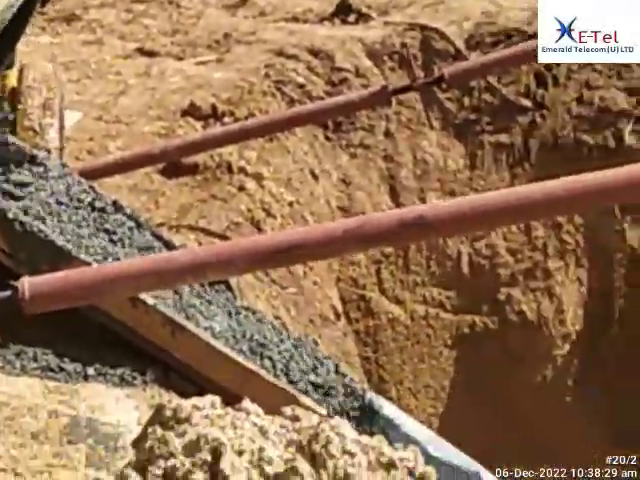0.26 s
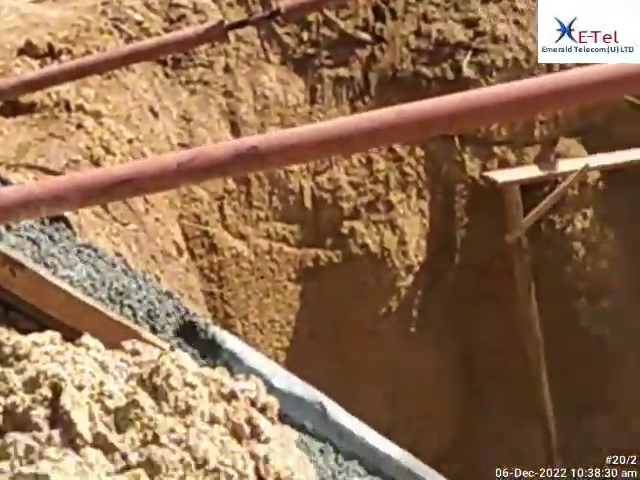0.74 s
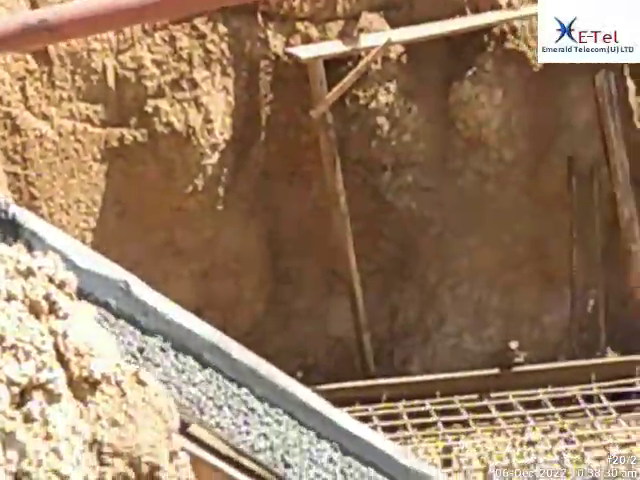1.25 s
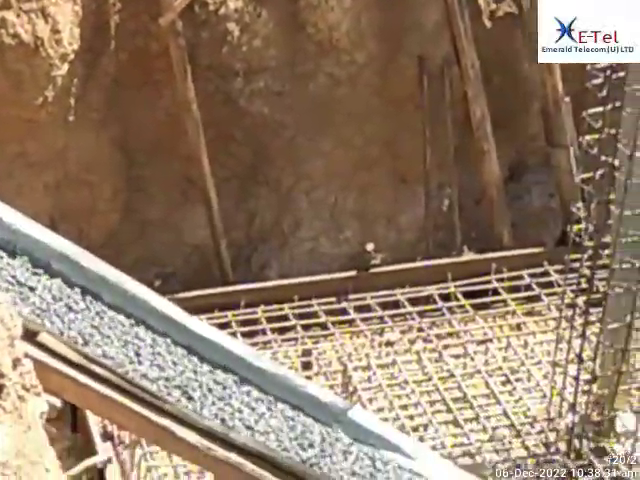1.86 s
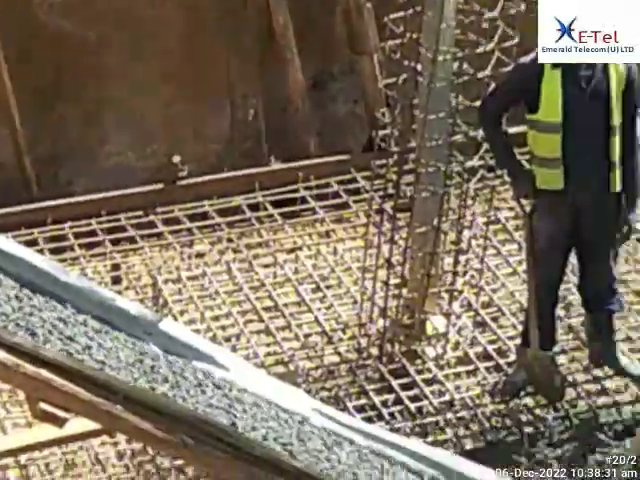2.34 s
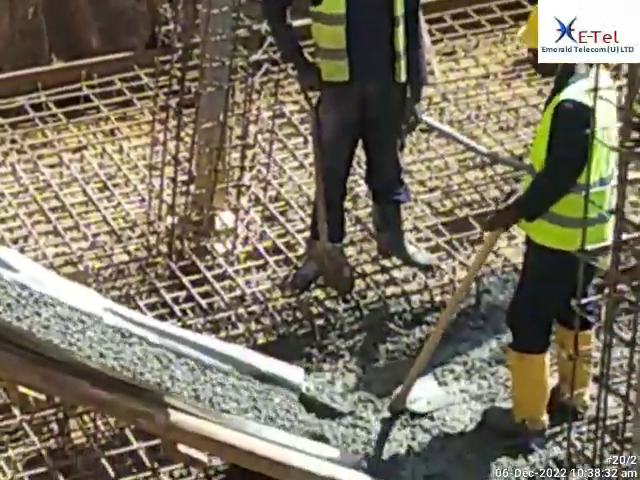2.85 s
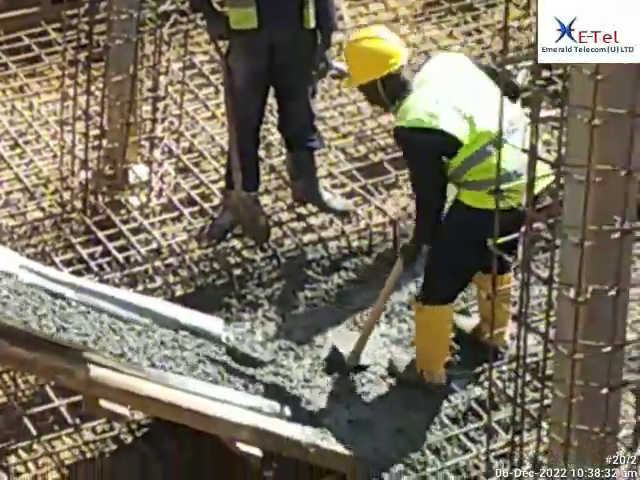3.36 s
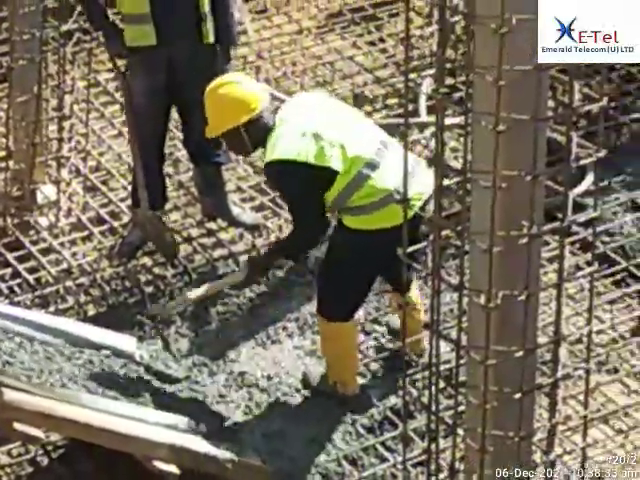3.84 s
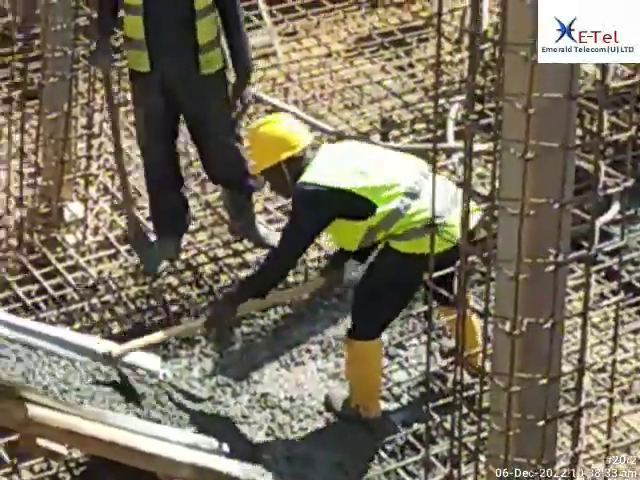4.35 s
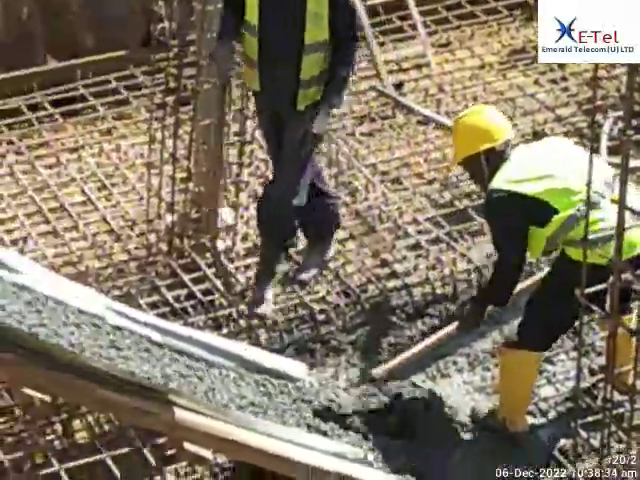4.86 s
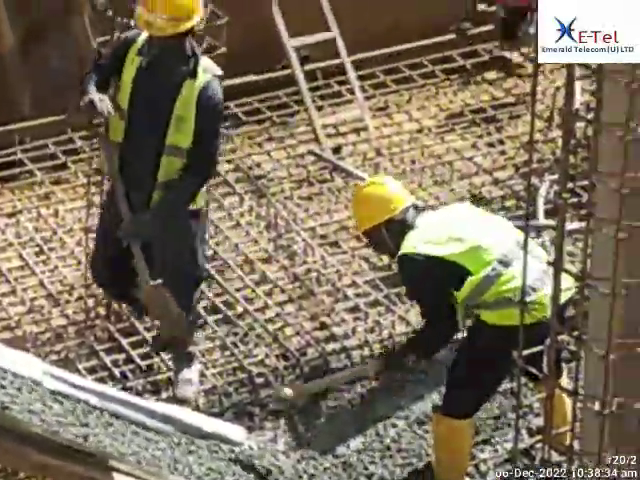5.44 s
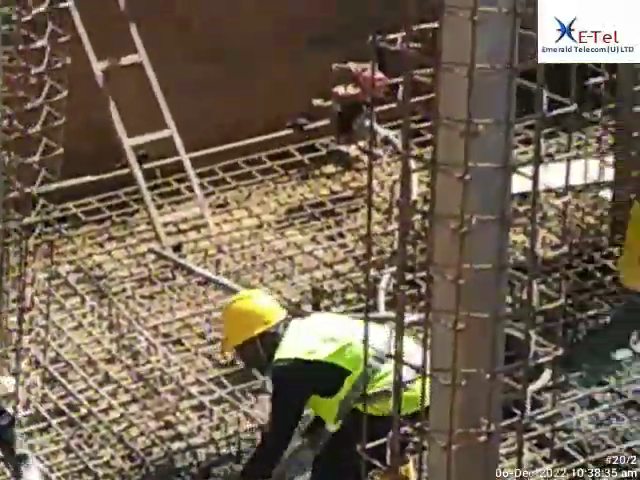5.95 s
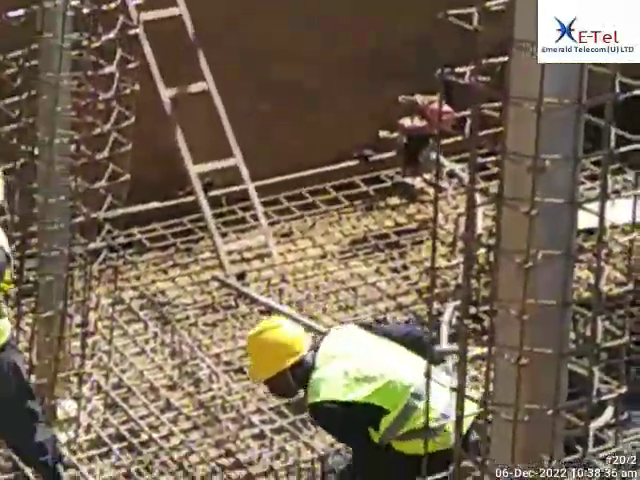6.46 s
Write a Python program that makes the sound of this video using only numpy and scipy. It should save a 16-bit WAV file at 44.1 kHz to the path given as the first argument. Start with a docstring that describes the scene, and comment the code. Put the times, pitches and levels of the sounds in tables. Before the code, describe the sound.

From 0 to about 6.75 seconds, a single-cylinder engine runs without pause, its hollow, dry exhaust chuffs firing roughly 11.5 times a second, with small block knocks and frame buzz in step. It quickens barely until 2 seconds, then slows gradually to below 11 a second at the end. A mixer drum rumbles beneath it, with irregular dull thuds of falling load throughout and stones clattering on steel. Wet gravel hisses continuously down a chute, with fine fizz and a fluttering bright rasp. Pebbles tick near 0.4, 0.85 and 2.4 seconds; larger stones knock around 0.9, 3.6-3.7, 4.9, 5.7 and 6.4. Brief gritty hoe scrapes come near 0.4, 3.6, 4.9, 5.4 and 6.2. A distant machine hums faintly. The phone microphone sounds close, thin in bass and slightly dulled on top, with short echoes from the pit walls.

```python
"""Regular exhaust chuffs strike the ear first, over a rumbling drum and the hiss of wet gravel on a chute.
A single-cylinder engine drives a concrete mixer drum beside a pit, slowing a little under load in the end.
Pulses and knocks locked to the crank make the engine; shaped random spectra make drum, gravel and hoe.
Stones, pebbles and falling load are struck modes, and a distant machine is a set of wavering tones.
All is heard through a phone microphone that thins steady noise."""
import sys
import numpy as np
from scipy import signal
from scipy.io import wavfile
from scipy.ndimage import uniform_filter1d

SR = 44100
rng = np.random.default_rng(int(sys.argv[2]) if len(sys.argv) > 2 else 0)


def dump(signal):
    """Clip the signal to [-1, 1] and save it as 16-bit WAV at the path in sys.argv[1]."""
    limited = np.clip(np.atleast_2d(signal).T, -1, 1)
    pcm = np.round(limited * 32767).astype(np.int16)
    wavfile.write(sys.argv[1], SR, pcm)


N = 295911


def amp(db):
    """Logarithmic level: 20 dB is a factor of ten in amplitude."""
    return 10 ** (np.asarray(db) / 20)


def evened(x):
    """Normalization: scales a signal to rms 1."""
    return x / np.sqrt(np.mean(x ** 2) + 1e-20)


def smoothed(x, size, axis=-1):
    """Low-pass smoothing by two moving averages, which together weigh the samples as a triangle."""
    return uniform_filter1d(uniform_filter1d(x, size, axis), size, axis)


def curve(rows, column):
    """Linear interpolation: one column of a time table, sample by sample."""
    rows = np.asarray(rows)
    return np.interp(np.arange(N) / SR, rows[:, 0], rows[:, column])


def wander(hz):
    """Low-pass noise: slow chance of rms 1 that changes about hz times a second."""
    return evened(smoothed(rng.standard_normal(N), max(int(SR / hz), 1)))


def ring(hz, t60, rise_s):
    """Modal decay: one struck mode that builds up gradually and falls by 60 dB in t60 seconds."""
    t = np.arange(4000) / SR
    envelope = amp(-60 * t / t60) * (1 - np.exp(-t / rise_s))
    return envelope * np.sin(2 * np.pi * hz * t)


# Tones of a distant machine. Each row: frequency in Hz, middle level in dB rms.
HUM_TONES = [(107, -44), (158, -43), (167.5, -37), (197, -39), (236, -40), (250, -43), (276, -44),
             (302, -45), (342, -46), (362, -44)]


def hum():
    """Additive synthesis: steady partials of a far machine waver in strength and phase."""
    t = np.arange(N) / SR
    out = np.zeros(N)
    for hz, db in HUM_TONES:
        strength = np.sqrt(2) * amp(db + 3 * wander(8))
        turns = hz * t + rng.random() + .1 * wander(8)
        out += strength * np.sin(2 * np.pi * turns)
    return out


# Speed of the engine. Each row: time in seconds, firings per second.
ENGINE_SPEED = [(0.0, 11.499), (0.7, 11.644), (1.4, 11.737), (2.1, 11.748), (2.8, 11.638), (3.5, 11.543),
                (4.2, 11.393), (4.9, 11.197), (5.6, 11.037), (6.2, 10.868), (6.75, 10.722)]
FIRST_CYCLE = -.3595  # crank position at the start, in cycles; the exhaust opens on whole numbers


def crank():
    """Phase is the integral of speed: the engine cycles turned so far."""
    return FIRST_CYCLE + np.cumsum(curve(ENGINE_SPEED, column=1)) / SR


# Brief dips and lifts of level. Each row: time in seconds, half length in seconds, then the change in dB
# of the rumble, of the clatter, and of the gravel with its rasp.
BRIEF_DIPS = [(0.75, 0.015, -10.5, 0.5, -1), (2.112, 0.026, -18, 0.5, -1), (2.744, 0.02, -11.5, -2, -2.5),
              (3.398, 0.04, 4, -2.5, -0.5), (3.596, 0.055, -10, 1.5, 3), (4.35, 0.012, -9, 2, -1),
              (4.482, 0.028, -8, -3.5, 0), (5.522, 0.04, -19, 0.5, -1), (6.168, 0.016, -7, 0.5, 0)]


def dips(column):
    """Gaussian modulation: the sum of the brief level changes of one layer, in dB."""
    t = np.arange(N) / SR
    return sum(row[column] * np.exp(-((t - row[0]) / row[1]) ** 2) for row in BRIEF_DIPS)


# Sheet-metal resonances and one hollow, which colour every noise.
# Each row: frequency in Hz, width in Hz, change in dB at the centre.
SHEET_MODES = [(1010, 40, 6), (1145, 70, 2), (1560, 60, 2), (1680, 80, -3), (2270, 100, 4), (4700, 150, 2)]
SURGE_DB, SURGE_HZ, SURGE_S = .95, 500, .05  # strength, width and length of the broad swells
SURGE_FROM_HZ = 1500  # the swells fade out below this


def noise(shape, size, patchy_db, patch_hz, patch_s, flicker_db):
    """Stochastic superposition: random spectra of a given shape with drifting patches and shared flicker."""
    hop, hz = size // 4, np.fft.rfftfreq(size, 1 / SR)
    real, imaginary, patches, surges = rng.standard_normal((N // hop + 5, len(hz), 4)).T

    surges = smoothed(surges, int(SURGE_HZ * size / SR) + 1, 0)
    surges = evened(smoothed(surges, int(SURGE_S * SR / hop) + 1, 1))
    wide, long = max(int(patch_hz * size / SR), 1), max(int(patch_s * SR / hop), 1)
    patches = evened(smoothed(smoothed(patches, wide, 0), long, 1))
    flicker = evened(uniform_filter1d(rng.standard_normal(real.shape[1]), long))

    f, db = np.transpose(shape)
    # the shape is joined along log frequency and silent outside its ends
    db = np.interp(np.log(hz + 1), np.log(f + 1), db, left=-100, right=-100)
    db = db + sum(lift / (1 + (2 * (hz - at) / width) ** 2) for at, width, lift in SHEET_MODES)
    surge_db = SURGE_DB * np.minimum(hz / SURGE_FROM_HZ, 1)[:, None] ** 2 * surges
    level_db = db[:, None] + patchy_db * patches + surge_db + flicker_db * flicker
    spectra = (real + 1j * imaginary) * amp(level_db)
    return evened(signal.istft(spectra, nperseg=size, noverlap=size - hop)[1][:N])


# Noise of the load turning in the drum. Each row: frequency in Hz, relative density in dB per Hz.
RUMBLE_SHAPE = [(35, -43), (60, -15), (80, -15.5), (102, 12), (140, 1), (185, 1.5), (253, 3), (290, 5),
                (325, -8), (420, -30.5)]
# Noise of stones on steel. Each row: frequency in Hz, relative density in dB per Hz.
CLATTER_SHAPE = [(250, -18.5), (320, -1), (400, 1.5), (470, 1), (530, -7), (600, -5.5), (710, -8),
                 (830, -3), (920, -5.5), (1120, -8.5), (1210, -6), (1310, -7), (1700, -30), (2210, -32.5)]
# Levels before dips and swings. Each row: time in seconds, drum rumble in dB, clatter of stones on
# steel in dB, sliding gravel in dB (the last is played by the chute).
LOAD_FLOW = [(0.0, -26, -26.5, -29), (.3, -30, -26.5, -28.5), (.7, -24, -26.5, -28.5),
             (.95, -26, -27, -29.5), (1.25, -25, -27, -29), (1.8, -24.5, -27.5, -29.5),
             (2.1, -26, -27.5, -29), (2.6, -26, -27, -29), (3.2, -26.5, -28, -28.5), (3.8, -24, -27.5, -30),
             (4.0, -27, -28, -30), (4.4, -25, -28, -29.5), (5.0, -27.5, -29, -29),
             (5.25, -25.5, -28.5, -30), (5.37, -24, -28, -30), (5.5, -27.5, -28.5, -28.5),
             (5.9, -26.5, -28.5, -29.5), (6.25, -31, -29, -29), (6.75, -29.5, -26.5, -30.5)]
LUMPS_DB, LUMPS_PER_S = 1, 26  # the falling load makes the rumble uneven
STEADY, STEADY_S = .7, .025  # share of the rumble's chance swells evened out, averaging length (s)
CLATTER_SWING_DB, CLATTER_PEAK = .4, .0  # stones rattle hardest at this place in the engine cycle (0-1)


def drum():
    """Amplitude modulation: the rumble dips after each chuff, and engine shaking makes the clatter swing."""
    rumble = noise(RUMBLE_SHAPE, 2048, patchy_db=1.0, patch_hz=50, patch_s=.06, flicker_db=0.3)
    power = abs(smoothed(rumble ** 2, int(STEADY_S * SR)) + .02)
    rumble = evened(rumble / power ** (STEADY / 2))
    clatter = noise(CLATTER_SHAPE, 2048, patchy_db=1.3, patch_hz=70, patch_s=.05, flicker_db=0.4)

    cycles = crank()
    chuff_dip_db = -8.0 * np.exp(-((cycles % 1 - .15) / 0.055) ** 2)
    shake_db = CLATTER_SWING_DB * np.cos(2 * np.pi * (cycles - CLATTER_PEAK))
    rumble_db = curve(LOAD_FLOW, column=1) + dips(column=2) + chuff_dip_db
    rumble_db += LUMPS_DB * wander(LUMPS_PER_S)
    clatter_db = curve(LOAD_FLOW, column=2) + dips(column=3) + shake_db
    return amp(rumble_db) * rumble + amp(clatter_db) * clatter


# Hiss of sliding gravel. Each row: frequency in Hz, relative density in dB per Hz.
GRAVEL_SHAPE = [(820, -26.5), (1400, -2.5), (1570, -0.5), (1700, -2), (2260, -1), (2720, -2.5),
                (3600, -2.5), (4200, -2.5), (4620, -7), (5200, -2), (6050, -7), (6200, -26), (7000, -38)]
# Fine fizz, mostly above the hiss. Each row: frequency in Hz, relative density in dB per Hz.
FIZZ_SHAPE = [(5600, -20), (6050, -3), (6200, 0), (7000, 0), (7640, 1), (7700, -26), (8800, -23),
              (9400, -25), (10000, -32), (11000, -52)]
# Stones rasping on the chute floor. Each row: frequency in Hz, relative density in dB per Hz.
RASP_SHAPE = [(3900, -35.5), (4250, -7), (4450, -1), (4800, -3), (5100, -12.5), (5500, -25.5)]
# Level of the bright rasp before dips and flutter. Each row: time in seconds, level in dB.
RASP_LEVEL = [(0.0, -35.5), (1.58, -34.5), (1.73, -36.5), (2.13, -32.5), (2.7, -36), (2.79, -35),
              (2.9, -36.5), (3.13, -33), (3.22, -37.5), (3.32, -32.5), (3.38, -44), (3.42, -33.5),
              (3.62, -36), (3.97, -38), (4.46, -32.5), (4.53, -39), (5.13, -35), (5.32, -38.5),
              (5.36, -33.5), (5.8, -38), (6.16, -35.5), (6.75, -38)]
FLUTTER_DB, FLUTTER_PER_S = 0.21, 24  # uneven flow makes hiss, fizz and rasp flutter together


def chute():
    """Granular flow: many small impacts merge into a dense hiss, with fine fizz and a bright rasp."""
    hiss = noise(GRAVEL_SHAPE, 1024, patchy_db=2.0, patch_hz=60, patch_s=.08, flicker_db=-0.69)
    fizz = noise(FIZZ_SHAPE, 1024, patchy_db=2.0, patch_hz=70, patch_s=0.06, flicker_db=0.0)
    rasp = noise(RASP_SHAPE, 1024, patchy_db=1.3, patch_hz=110, patch_s=.05, flicker_db=0.03)
    slide = amp(curve(LOAD_FLOW, column=3)) * (hiss + amp(-15.0) * fizz)
    slide += amp(curve(RASP_LEVEL, column=1)) * rasp
    return amp(dips(column=4) + FLUTTER_DB * wander(FLUTTER_PER_S)) * slide


# Strokes of the hoe in the gravel. Each row: start in seconds, level in dB, fading time in seconds.
HOE_SCRAPES = [(.4, -36, 0.027), (3.576, -27.5, 0.011), (3.595, -34, 0.026), (4.92, -31.5, .015),
               (5.36, -29.5, 0.028), (6.198, -27, 0.017), (6.211, -31, 0.016)]
# Noise of the hoe blade on stones. Each row: frequency in Hz, relative density in dB per Hz.
GRIT_SHAPE = [(700, -19.5), (1000, 1.5), (2300, -3), (3500, 0), (4700, -1), (6000, -2), (7500, -16),
              (7700, -36.5)]
SCRAPE_RISE_S = 0.0025


def hoe():
    """Friction noise: the blade drags over stones, each stroke rising fast and fading exponentially."""
    t = np.arange(N) / SR
    grit = noise(GRIT_SHAPE, 256, patchy_db=2.0, patch_hz=1500, patch_s=.006, flicker_db=1.5)
    drag = np.zeros(N)
    for start, db, fade in HOE_SCRAPES:
        rise = np.clip((t - start) / SCRAPE_RISE_S, 0, 1)
        drag += amp(db) * rise * np.exp(-np.maximum(t - start, 0) / fade)
    return drag * grit


RATTLE_DB, RATTLE_PER_S = -45, 260  # rms level, mean number of pebbles per second
RATTLE_SPREAD_DB, RATTLE_HZ = 3, (1490, 4200)  # spread of strength, lowest and highest pitch


def rattle():
    """Poisson-like impacts: many small pebbles of 16 pitches strike at random; a few are large."""
    strikes = rng.random(N) < RATTLE_PER_S / SR
    size = amp(RATTLE_SPREAD_DB * np.minimum(rng.exponential(1, N), 4)) * strikes
    kind = rng.integers(0, 16, N)
    out = np.zeros(N)
    for k, hz in enumerate(np.geomspace(*RATTLE_HZ, 16)):
        out += signal.oaconvolve(size * (kind == k), ring(hz, t60=0.038, rise_s=0.00053))[:N]
    return amp(RATTLE_DB) * evened(out)


def struck(rows, t60, rise_s):
    """Superposition of single blows, each ringing briefly at its own pitch."""
    out = np.zeros(N + 4000)
    for s, db, hz in rows:
        out[round(s * SR):][:4000] += amp(db) * ring(hz, t60, rise_s)
    return out[:N]


# Large stones knocking the drum.
# Each row: start in seconds, level in dB before the gradual rise, ring in Hz.
STONE_KNOCKS = [(0.858, -18, 1180), (1.609, -22, 835), (1.794, -27, 990), (2.543, -24, 790),
                (2.783, -25, 970), (3.084, -25, 1050), (3.612, -19, 990), (3.7, -19.5, 825),
                (3.981, -21, 970), (4.915, -19.5, 1087), (5.749, -18, 943), (6.363, -16.5, 987),
                (6.583, -19.5, 1004)]
# Pebbles ticking on the chute.
# Each row: start in seconds, level in dB before the gradual rise, ring in Hz.
PEBBLE_TICKS = [(0.3634, -17.5, 2060), (0.8464, -14, 2040), (1.8924, -19.5, 2090), (2.1134, -20, 2330),
                (2.4124, -14, 4830), (3.0884, -21.5, 4700), (4.8554, -17, 2260), (5.6794, -23, 2290)]
# The load falling heavily in the drum.
# Each row: start in seconds, level in dB before the gradual rise, ring in Hz.
LOAD_THUDS = [(0.028, -15.5, 139.5), (0.14, -14.5, 266), (0.274, -10, 99.6), (0.426, -21, 101),
              (0.61, -23, 245), (0.718, -16, 108), (0.79, -20.5, 99), (0.949, -16.5, 151),
              (1.119, -15, 142.5), (1.204, -12, 133.4), (1.227, -12.5, 232), (1.46, -9.5, 153),
              (2.146, -21.5, 106), (2.527, -18.5, 236), (2.651, -14, 139), (2.754, -18, 107),
              (2.911, -14.5, 238), (3.061, -13, 121.5), (3.139, -14, 182), (3.45, -13.5, 110),
              (3.505, -13.5, 165), (3.599, -16, 161), (3.741, -15, 102), (3.882, -12, 172),
              (4.014, -12, 148), (4.352, -20, 203), (4.513, -20.5, 274), (5.177, -21, 125),
              (5.254, -17.5, 158), (5.372, -21, 100.7), (5.574, -17, 163), (5.715, -19.5, 212),
              (6.284, -19.5, 115), (6.499, -15, 106), (6.644, -14, 96.9)]


def impacts():
    """Impact excitation: stones and pebbles ring their own modes; the falling load first swings downward."""
    stones = struck(STONE_KNOCKS, t60=0.074, rise_s=0.009)
    ticks = struck(PEBBLE_TICKS, t60=0.011, rise_s=0.00068)
    thuds = struck(LOAD_THUDS, t60=0.11, rise_s=0.0068)
    return stones + ticks - thuds


def beats(cycles, place, jitter_s, spread_db):
    """Pulse train: one click per engine cycle at a given place, a little uneven in time and strength."""
    at = np.flatnonzero(np.diff(np.floor(cycles - place)) > 0)
    chance = rng.standard_normal((len(at), 2))
    at = at + (jitter_s * SR * chance[:, 0]).astype(int)
    train = np.zeros(N)
    train[np.clip(at, 0, N - 1)] = amp(spread_db * chance[:, 1])
    return train


def pit_echo(t60):
    """Sparse reflection: echoes of random sign from earth walls and formwork, of total energy 1."""
    at = np.arange(400, 6000, 40) + rng.integers(0, 40, 140)
    taps = np.zeros(6100)
    taps[at] = rng.choice([-1., 1.], len(at)) * amp(-60 * at / SR / t60)
    return taps / np.linalg.norm(taps)


# Exhaust puff in pipe and silencer. Each row: frequency in Hz, half length in seconds,
# peak in dB before the blow strength, delay in seconds.
EXHAUST_MODES = [(414, .0042, -15.8, -.0002), (250, .005, -33, .004), (160, .011, -34, .001),
                 (100, .012, -33, -.005), (620, .004, -37, .001), (1210, .004, -33, .003)]
# Strength of the exhaust blows. Each row: time in seconds, change in dB.
CHUFF_STRENGTH = [(0, 0), (.2, 1), (.38, -.5), (1.05, 2), (1.15, -.5), (1.5, 1), (1.75, -1), (1.96, 1.5),
                  (2.17, 0), (2.26, -5), (2.43, -1), (2.6, 1), (3.2, 1.5), (3.46, 0), (4.07, 1),
                  (4.33, -1.5), (4.6, -1), (4.74, 1), (5.05, -1.5), (5.36, 1), (5.5, -1.5), (5.86, 1),
                  (6.13, -.5), (6.32, -4), (6.5, -1.5), (6.75, -2)]
PUFF_GLIDE = 16  # sets how fast the puff's pitch rises as the valve opens (share per second)


def exhaust(cycles):
    """Pipe resonance: the valve opens and shuts gradually, so each mode swells and dies smoothly."""
    t = np.arange(4000) / SR
    puff = np.zeros(4000)
    for hz, half, db, delay in EXHAUST_MODES:
        u = t - t[2000] - delay
        turns = hz * u * (1 + PUFF_GLIDE * u / 2)
        puff -= amp(db) * np.exp(-(u / half) ** 2) * np.cos(2 * np.pi * turns)
    blows = beats(cycles, 0, jitter_s=.0001, spread_db=.8) * amp(curve(CHUFF_STRENGTH, column=1))
    chuffs = signal.oaconvolve(blows, puff, "same")
    return chuffs + amp(-7.0) * signal.oaconvolve(chuffs, pit_echo(t60=.2))[:N]


# Short drops of pressure at the pipe mouth. Each row: place in the cycle (0-1), middle peak in dB.
PRESSURE_DROPS = [(.912, -26), (0.178, -23), (0.285, -27), (0.385, -27)]
DROP_S = 0.0008  # half width of a drop


def pressure_drops(cycles):
    """Rarefaction: short negative pulses of pressure at fixed places in each cycle."""
    t = np.arange(401) / SR
    drop = -np.exp(-((t - t[200]) / DROP_S) ** 2)
    out = np.zeros(N)
    for place, db in PRESSURE_DROPS:
        pulses = beats(cycles, place, jitter_s=.0003, spread_db=2.5)
        out += amp(db) * signal.oaconvolve(pulses, drop, "same")
    return out


# Combustion and valve knocks in the block. Each row: place in the cycle (0-1), frequency in Hz,
# time to fall by 60 dB in seconds, level in dB before the knock strength and gradual rise.
BLOCK_KNOCKS = [(.505, 1207, 0.051, -26), (0.6, 940, 0.04, -28.5), (.66, 171, 0.044, -24),
                (.88, 2270, 0.024, -39), (0.6, 4650, 0.018, -36)]
# Strength of the knocks. Each row: time in seconds, change in dB.
KNOCK_STRENGTH = [(0, 6), (.8, -2.5), (.94, -3.5), (1.11, 6), (1.6, -6.5), (2.39, 7), (2.7, -3), (3.15, 1),
                  (3.9, -10), (4.4, 6), (5.0, -0.5), (6.09, 7), (6.75, -1)]


def block_knocks(cycles):
    """Modal excitation: combustion and valves strike modes of the block once in every cycle."""
    out = np.zeros(N)
    for place, hz, t60, db in BLOCK_KNOCKS:
        strength = amp(db + curve(KNOCK_STRENGTH, column=1))
        blows = beats(cycles, place, jitter_s=.001, spread_db=1.5) * strength
        out += signal.oaconvolve(blows, ring(hz, t60, rise_s=0.0013))[:N]
    return out


# Shaking of the frame. Each row: multiple of the firing rate, middle level in dB rms.
FRAME_ORDERS = [(6, -50), (8, -41), (12, -47), (15, -48), (21, -50)]


def frame(cycles):
    """Harmonic orders: the frame shakes at whole multiples of the firing rate, wavering in strength."""
    out = np.zeros(N)
    for multiple, db in FRAME_ORDERS:
        strength = np.sqrt(2) * amp(db + 3 * wander(12))
        out += strength * np.sin(2 * np.pi * (round(multiple) * cycles + rng.random()))
    return out


def engine():
    """Phase locking: chuffs, pressure drops, knocks and the shaking frame all follow one crank."""
    cycles = crank()
    return exhaust(cycles) + pressure_drops(cycles) + block_knocks(cycles) + frame(cycles)


def scene():
    """Linear superposition: all sources add up at one microphone."""
    return (hum() + drum() + chute() + hoe() + rattle() + impacts() + engine())[None]


def suppress(x, strength, least_db):
    """Spectral subtraction: each frequency is lowered while it lies near its long-run mean power."""
    z = signal.stft(x, nperseg=1024, noverlap=768)[2]
    power = uniform_filter1d(abs(z) ** 2, size=3, axis=-1) + 1e-20
    keep = 1 - strength * power.mean(-1, keepdims=True) / power
    keep = np.maximum(keep, amp(2 * least_db))  # a share of power, hence twice the dB
    return signal.istft(z * np.sqrt(keep), nperseg=1024, noverlap=768)[1][:, :N]


EDGE_HZ = 11000  # upper band limit


def record(dry):
    """Band limiting: the small microphone drops deep bass, the phone thins steady noise and cuts the top."""
    bass_cut = signal.butter(N=6, Wn=80.0, btype="high", fs=SR, output="sos")
    thin = suppress(signal.sosfilt(bass_cut, dry), strength=.3, least_db=-6.0)
    top_cut = signal.firwin(511, EDGE_HZ, window=("kaiser", 9), fs=SR)
    return signal.oaconvolve(thin, top_cut[None], "same")


dry = scene()
out = record(dry)
dump(out)
```